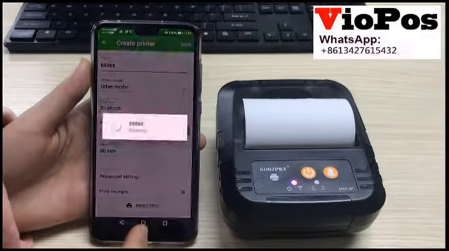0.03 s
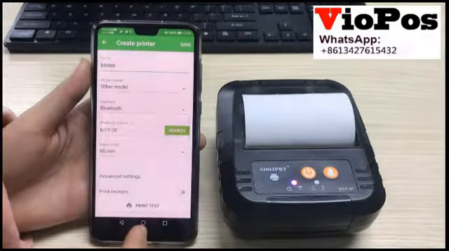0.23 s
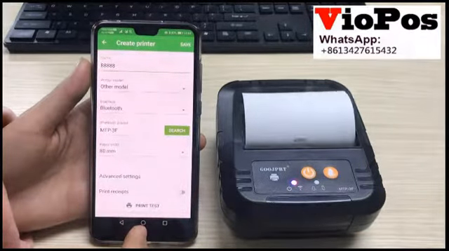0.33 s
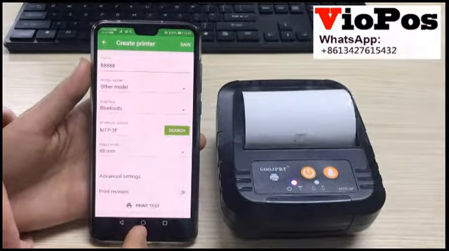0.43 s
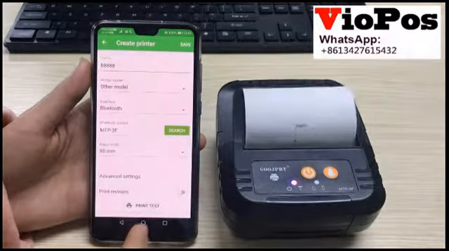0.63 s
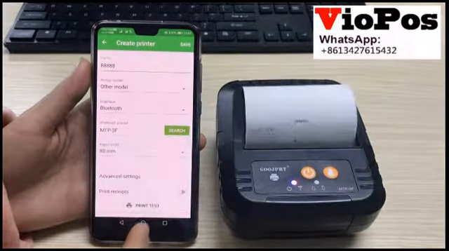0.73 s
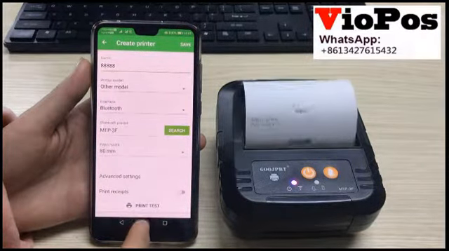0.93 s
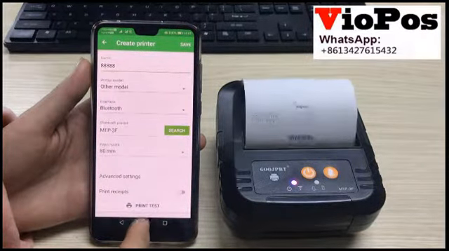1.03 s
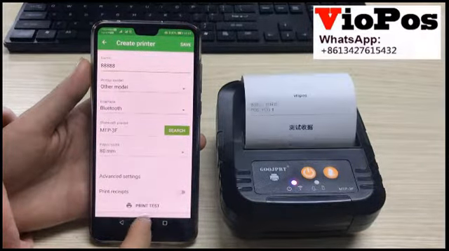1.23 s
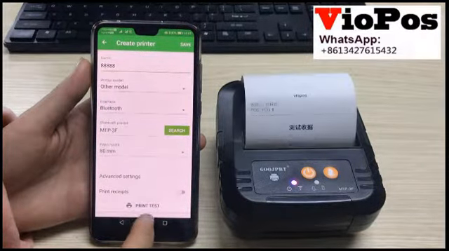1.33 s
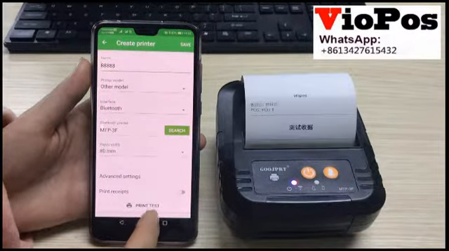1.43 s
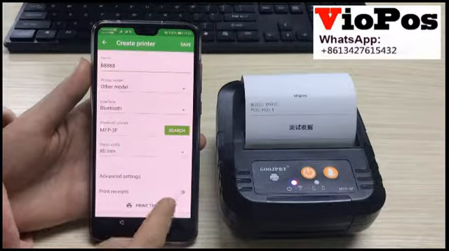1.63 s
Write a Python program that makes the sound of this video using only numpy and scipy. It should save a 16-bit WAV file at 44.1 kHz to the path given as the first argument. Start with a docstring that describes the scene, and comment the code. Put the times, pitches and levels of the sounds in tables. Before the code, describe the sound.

A small thermal receipt printer starts with a sharp plastic clack, whirs with a buzzing motor and raspy paper feed, briefly groans twice, then stops in a quick chatter; close microphone in a quiet room.

```python
"""Low rumble and faint air of a quiet room come first; then a small thermal receipt printer feeds out a slip.
It starts with a clack: sharp ticks of noise over decaying tones of the plastic body.
The stepper motor whines in sine tones, its gears shake the case, and each step rasps the paper with a burst
of noise; the slip's rings all sink in pitch as it grows. Twice the motor slows onto the case's resonance.
A soft thud comes late in the feed, which ends in a short chatter, then a faint high ping."""
import sys
import numpy as np
from scipy import signal
from scipy.fft import rfft, irfft
from scipy.io import wavfile
from scipy.ndimage import uniform_filter1d

SR = 44100
rng = np.random.default_rng(int(sys.argv[2]) if len(sys.argv) > 2 else 0)


def output_pcm(signal):
    """Save a mono or channel-first signal as 16-bit PCM at the path in sys.argv[1].

    Samples are clipped to [-1, 1] before scaling.
    """
    pcm = np.clip(np.atleast_2d(signal).T, -1, 1) * 32767
    wavfile.write(sys.argv[1], SR, np.round(pcm).astype(np.int16))


N = 74970  # length [samples]

# Low rumble of the room: colour (frequency [Hz], level [dB]), then loudness (time [s], level [dB])
RUMBLE_COLOUR = [(20, -13), (33, -12), (48, -6), (65, -4.5), (100, -14.5), (200, -18), (1000, -92)]
RUMBLE_LEVEL = [(0, -59), (0.598, -60), (1.1, -63.5), (1.45, -57), (1.7, -58.5)]
# Air of the room: colour (frequency [Hz], level [dB]), then loudness (time [s], level [dB])
AIR_COLOUR = [(60, -33), (110, -4), (160, 2.5), (220, -4.5), (290, -0.5), (400, -13), (800, -11),
              (1600, -19), (4200, -23), (5000, -29.5), (10000, -36), (15500, -42.5)]
AIR_LEVEL = [(0, -56.5), (1.3, -57.5), (1.7, -54.5)]

# Clacks as the mechanism takes up:
# (time [s], body level [dB], tick level [dB], tick 60 dB fall time [s], tick top frequency [Hz])
CLACKS = [(0.1969, -31, -32, 0.023, 9600), (0.2027, -40, -37, .016, 10000),
          (0.216, -51, -31, 0.0095, 17100)]
# Ringing tones of the body, relative to each other (frequency [Hz], level [dB], 60 dB fall time [s])
BODY_MODES = [(504, -6, 0.095), (730, -22, 0.061), (880, 3, 0.08), (1160, 1.5, 0.048), (1440, 4.5, 0.061),
              (5970, 3.5, .02), (6200, 2, .018)]
# Colour of the dense knock beneath those tones (frequency [Hz], level [dB])
KNOCK_COLOUR = [(380, -25), (560, 3.5), (900, 1), (1450, 5.5), (1800, -21), (4000, -16.5)]
# Colour of the ticks (frequency [Hz], level [dB])
TICK_COLOUR = [(500, -30), (2500, 2), (5000, 2), (6500, 5.5), (8000, 0.5), (9300, 5.5), (11000, -7),
               (15500, -18)]

# Moments when the motor labours, from mid-slowing to mid-recovery:
# (start [s], end [s], drive on the case [dB], extra paper rasp [dB])
LABOURS = [(.646, .676, 0.5, 0), (1.159, 1.19, 2.5, 4)]
# Tones of the motor whine, before the load acts (multiple of the step rate [-], level [dB])
WHINE_TONES = [(1, -62), (2, -46.5), (3, -64.5), (4, -59.5), (5, -63), (6, -66), (8, -61), (9, -62.5),
               (10, -89), (12, -59), (14, -65)]
# How the load on the motor changes the whine and case shake (time [s], level [dB])
LOAD = [(.2, -1), (.35, -1.5), (.6, -3), (.8, -1.5), (.89, -4), (1.02, -1), (1.25, -1.5), (1.4, -4)]
# Unevenness of the gear train (multiple of the gear rate [-], depth [-])
GEAR_UNEVENNESS = [(1, 0.24), (2, 0.33), (3, 0.31)]
# Resonances of the case (frequency [Hz], width [Hz], level [dB])
CASE_RESONANCES = [(535.5, 49, -3), (624.4, 22, 1), (765, 21.7, -0.5), (1146, 70, -14), (1455, 108, -14.5),
                   (1622, 50, -40)]
# Colour of the paper rasp (frequency [Hz], level [dB])
RASP_COLOUR = [(400, -10.5), (700, 5), (1100, -5), (2000, -5), (2700, -4.5), (3500, -1), (4400, -1.5),
               (5000, -7), (5700, -1.5), (6600, -3.5), (7700, -13.5), (9200, -10.5), (10400, -17),
               (11800, -14), (15500, -17)]
# Rings of the growing slip (start frequency [Hz], stop frequency [Hz], width [Hz],
# start level [dB], stop level [dB])
SLIP_RINGS = [(3215, 2060, 530, -50.5, -53.5), (4270, 2900, 1000, -56.5, -55),
              (6870, 5200, 970, -63.5, -55.5), (12800, 11800, 3300, -63.5, -67.5)]

# Chatter at the end of the feed (time [s], half length [s], level [dB], upper resonances [dB])
CHATTERS = [(1.366, .006, -40.5, -9), (1.3795, 0.0043, -31, -0.5), (1.3933, 0.0027, -32, -3.5),
            (1.414, 0.0023, -39.5, -16)]
# Resonances rung by the chatter; the first two are the lower ones (frequency [Hz], width [Hz], level [dB])
CHATTER_RESONANCES = [(2120, 48, 4.5), (2570, 100, -3), (3260, 490, -4), (3800, 220, -9), (4350, 350, -2),
                      (5200, 160, 4), (5200, 170, -13)]
# Colour of the scrape between those resonances (frequency [Hz], level [dB])
CHATTER_NOISE_COLOUR = [(400, 3), (800, 5.5), (1600, -7), (2200, 10.5), (5600, -1), (7200, -14),
                        (15500, -10)]
# Noise bands of the faint ping (frequency [Hz], width [Hz], level [dB])
PING_BANDS = [(7950, 390, -1), (12400, 530, -12), (13500, 440, -3.5)]
# Colour of the room tail (frequency [Hz], level [dB])
ROOM_COLOUR = [(300, -13), (1000, 4.5), (2100, 1), (4300, -2.5), (5300, -7), (7500, 5.5), (15500, 0)]

# Clacks: T60 is the time to fall by 60 dB
KNOCK_DB, KNOCK_T60_S = -4.5, 0.062  # level relative to the clack's body level
TICK_ATTACK_S, BODY_ATTACK_S = 0.0008, 0.002

# Motor and gears
START_S, STOP_S, ATTACK_S, RELEASE_S = 0.208, 1.417, 0.015, 0.0026
STEP_HZ, SLOW_STEP_HZ, SLOW_RAMP_S = 297.2, 269.4, 0.016
SPEED_JITTER = 0.0012  # share of the step rate
WHINE_END_S, WHINE_FADE_S, WHINE_FLUTTER = 1.425, 0.068, 0.19
GEAR_HZ, GEAR_ROUGHNESS = 25.7, 0.3
SHAKE_DB = -51  # before the load acts
GROAN_DB = -37  # before each labour's own drive

# Paper
RASP_DB, RASP_DECAY = -49, 0.1  # decay in steps
RASP_BASE, HALF_STEP = 1, 0.63  # steady part, and strength of the scrape halfway through a step
RASP_SCATTER_DB = 4  # uneven strength from scrape to scrape
FLUTTER_DB = 2.14  # quick, uneven flutter in level of the slip's rings; the rasp flutters half as much
GRIT_SHARE, GRIT_DB = 0.08, -40  # chance of a catch per step, and its level

# Thud, chatter, ping and room
THUD_S, THUD_HZ, THUD_T60_S, THUD_DB = 1.1, 146, 0.16, -48
CHATTER_NOISE_DB, CHATTER_TOP_HZ = -6, 6500
PING_S, PING_T60_S, PING_DB = 1.482, 0.31, -56.5
ROOM_T60_S, ROOM_DB = 0.35, -12.5
TOP_HZ = 15500


def undb(db):
    """Turn decibels into gain."""
    return 10 ** (np.asarray(db) / 20)


def unit(x):
    """Scale to an rms (average strength) of 1."""
    return x / np.sqrt(np.mean(x ** 2))


def noise():
    """Make white noise."""
    return rng.standard_normal(N)


def walk(rate):
    """Wander smoothly at random, changing about rate times a second; rms 1."""
    hold = max(int(SR / rate), 1)
    held = np.repeat(noise()[:N // hold + 1], hold)
    smooth = uniform_filter1d(uniform_filter1d(held, hold), hold)
    return unit(smooth[:N])


def shape(x, points):
    """Filter by (frequency, level) points, joined along a logarithmic frequency scale."""
    hz, db = np.array(points).T
    f = np.maximum(np.fft.rfftfreq(N, 1 / SR), 1)
    gain = undb(np.interp(np.log(f), np.log(hz), db))
    return irfft(rfft(x) * gain, N)


def colour(x, points):
    """Filter by (frequency, level) points and scale to rms 1."""
    return unit(shape(x, points))


def resonate(x, rows):
    """Ring a bank of (frequency, width, level) resonances side by side."""
    out = 0
    for hz, width, db in rows:
        b, a = signal.iirpeak(hz, hz / width, fs=SR)
        out = out + undb(db) * signal.lfilter(b, a, x)
    return out


def lowpass(x, order, top_hz):
    """Take away the sound above top_hz."""
    return signal.sosfilt(signal.butter(order, top_hz, fs=SR, output="sos"), x)


def level_over_time(t, points):
    """Turn (time, level) points into a changing gain."""
    return undb(np.interp(t, *np.array(points).T))


def ramp(t, start, length):
    """Rise from 0 to 1."""
    return np.clip((t - start) / length, 0, 1)


def decay(t, start, t60):
    """Begin suddenly, then fall by 60 dB in t60 seconds."""
    return (t >= start) * np.exp(-np.log(1000) * np.maximum(t - start, 0) / t60)


def background(t):
    """The quiet room: coloured noise makes a low rumble and faint air."""
    rumble = level_over_time(t, RUMBLE_LEVEL) * colour(noise(), RUMBLE_COLOUR)
    air = level_over_time(t, AIR_LEVEL) * colour(noise(), AIR_COLOUR)
    return rumble + air


def clacks(t):
    """The mechanism snaps into motion: sharp ticks, and the plastic body swells up behind them."""
    out = 0
    for s, body_db, tick_db, tick_t60, top_hz in CLACKS:
        modes = 0
        for hz, db, t60 in BODY_MODES:
            tone = np.sin(2 * np.pi * (hz * (t - s) + rng.random()))
            modes = modes + undb(db) * decay(t, s, t60) * tone
        knock = undb(KNOCK_DB) * decay(t, s, KNOCK_T60_S) * colour(noise(), KNOCK_COLOUR)
        body = ramp(t, s, BODY_ATTACK_S) * (modes / 2 + knock)
        snap = lowpass(colour(noise(), TICK_COLOUR), 4, top_hz)
        tick = ramp(t, s, TICK_ATTACK_S) * decay(t, s, tick_t60) * snap
        out = out + undb(body_db) * body + undb(tick_db) * tick
    return out


def motor_whine(steps):
    """The stepper sings at multiples of its step rate, each tone fluttering by itself."""
    out = 0
    for k, db in WHINE_TONES:
        tone = np.sqrt(2) * np.cos(2 * np.pi * (k * steps + rng.random()))
        out = out + undb(db) * tone * (1 + WHINE_FLUTTER * walk(140))
    return out


def case_shake(t, steps):
    """Uneven gears vary the strength of the motor's jolts, which ring the case."""
    jolts = sum(np.cos(2 * np.pi * k * steps) for k in range(1, 8))
    gears = GEAR_ROUGHNESS * walk(260)
    for k, depth in GEAR_UNEVENNESS:
        gears = gears + depth * np.cos(2 * np.pi * (k * GEAR_HZ * t + rng.random()))
    return undb(SHAKE_DB) * unit(resonate(jolts * gears, CASE_RESONANCES))


def paper(t, steps):
    """A scrape at each step, a weaker one halfway, now and then a catch; noise rings the growing slip."""
    size = undb(RASP_SCATTER_DB * noise()[(2 * steps).astype(int)])
    on_step = np.exp(-(steps % 1) / RASP_DECAY)
    halfway = np.exp(-((steps + 0.5) % 1) / RASP_DECAY)
    scrapes = unit(RASP_BASE + size * (on_step + HALF_STEP * halfway))
    rasp = undb(RASP_DB + FLUTTER_DB * walk(69.1) / 2) * colour(scrapes * noise(), RASP_COLOUR)
    catches = rng.random(N)[steps.astype(int)] < GRIT_SHARE
    out = rasp + undb(GRIT_DB) * catches * on_step * colour(noise(), RASP_COLOUR)

    fed = ramp(t, START_S, STOP_S - START_S)  # share of the slip fed out
    for hz0, hz1, width, db0, db1 in SLIP_RINGS:
        # Shift the moving pitch down to zero, filter around it, then shift back up
        turn = np.exp(2j * np.pi * np.cumsum(hz0 + (hz1 - hz0) * fed) / SR)
        band = signal.bessel(2, width / 2, norm="mag", fs=SR, output="sos")
        ring = turn * signal.sosfilt(band, scrapes * noise() / turn)
        level = undb(db0 + (db1 - db0) * fed + FLUTTER_DB * walk(49))
        out = out + level * unit(ring.real)
    return out


def labour_groan(steps, spans):
    """The slowed motor drives the case's resonance with strong, unsteady heaves."""
    heaves = sum(np.cos(2 * np.pi * k * steps) for k in range(1, 7))
    push = sum(span * undb(drive_db) for span, (_, _, drive_db, _) in zip(spans, LABOURS))
    ringing = resonate(heaves * (1 + 0.25 * walk(300)) * push, CASE_RESONANCES)
    return ringing * undb(GROAN_DB) * np.sqrt(2)


def feed(t):
    """One shared count of motor steps drives the whine, case and paper; labouring slows the count."""
    running = ramp(t, START_S, ATTACK_S) * (1 - ramp(t, STOP_S, RELEASE_S))
    spans = []
    for start, end, _, _ in LABOURS:
        slowing = ramp(t, start - SLOW_RAMP_S / 2, SLOW_RAMP_S)
        recovery = ramp(t, end - SLOW_RAMP_S / 2, SLOW_RAMP_S)
        spans.append(slowing * (1 - recovery))
    slow = sum(spans)
    step_hz = STEP_HZ + (SLOW_STEP_HZ - STEP_HZ) * slow
    steps = np.cumsum(step_hz * (1 + SPEED_JITTER * walk(60))) / SR

    fade = 1 - ramp(t, WHINE_END_S - WHINE_FADE_S, WHINE_FADE_S)
    drive = running * fade * level_over_time(t, LOAD)
    # Labouring silences the whine and halves the ordinary shake
    motor = drive * (motor_whine(steps) * (1 - slow) + case_shake(t, steps) * (1 - slow / 2))
    strain = undb(sum(span * rasp_db for span, (_, _, _, rasp_db) in zip(spans, LABOURS)))
    return motor + labour_groan(steps, spans) + running * strain * paper(t, steps)


def thud(t):
    """The case gives a soft, low thud: one decaying sine."""
    return undb(THUD_DB) * decay(t, THUD_S, THUD_T60_S) * np.sin(2 * np.pi * THUD_HZ * (t - THUD_S))


def chatter(t):
    """Short bursts of scraping noise ring the slip and mechanism as the feed ends."""
    grit = undb(CHATTER_NOISE_DB) * colour(noise(), CHATTER_NOISE_COLOUR)
    scrape = lowpass(noise(), 6, CHATTER_TOP_HZ)
    scrape = scrape / np.std(resonate(scrape, CHATTER_RESONANCES))
    out = 0
    for s, half, db, upper_db in CHATTERS:
        burst = undb(db) * np.exp(-((t - s) / half) ** 2 / 2)
        lower = resonate(scrape * burst, CHATTER_RESONANCES[:2])
        upper = undb(upper_db) * resonate(scrape * burst, CHATTER_RESONANCES[2:])
        out = out + lower + upper + burst * grit
    return out


def ping(t):
    """After the stop, narrow bands of noise begin together and die away as a faint high ping."""
    ring = 0
    for hz, width, db in PING_BANDS:
        band = [(hz, 2 * width, 0)]
        # Two passes make the sides of the band steeper
        ring = ring + undb(db) * unit(resonate(resonate(noise(), band), band))
    return undb(PING_DB) * decay(t, PING_S, PING_T60_S) * unit(ring)


def room_tail(t, printer):
    """The room answers the printer with a decaying wash of noise-like echoes."""
    echoes = noise() * decay(t, 0.0037, ROOM_T60_S)  # first echo after 3.7 ms
    echoes = echoes / np.linalg.norm(echoes)
    return undb(ROOM_DB) * signal.fftconvolve(shape(printer, ROOM_COLOUR), echoes)[:N]


def scene():
    """The printer close by, a short room tail and the room's background, alike in both ears."""
    t = np.arange(N) / SR
    quiet_room = background(t)
    printer = clacks(t) + feed(t) + thud(t) + chatter(t)
    out = quiet_room + printer + room_tail(t, printer) + ping(t)
    return np.array([out, out])


def record(dry):
    """The recorder cuts the top with a steep low-pass filter."""
    return signal.sosfilt(signal.ellip(10, 0.1, 70, TOP_HZ, fs=SR, output="sos"), dry)


dry = scene()
out = record(dry)
output_pcm(out)
```